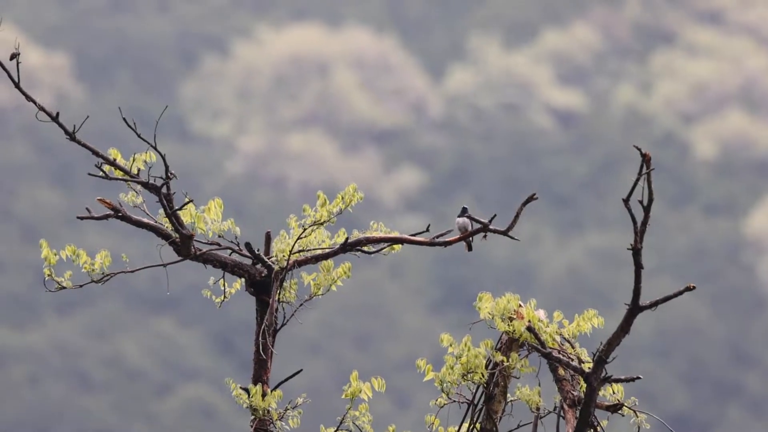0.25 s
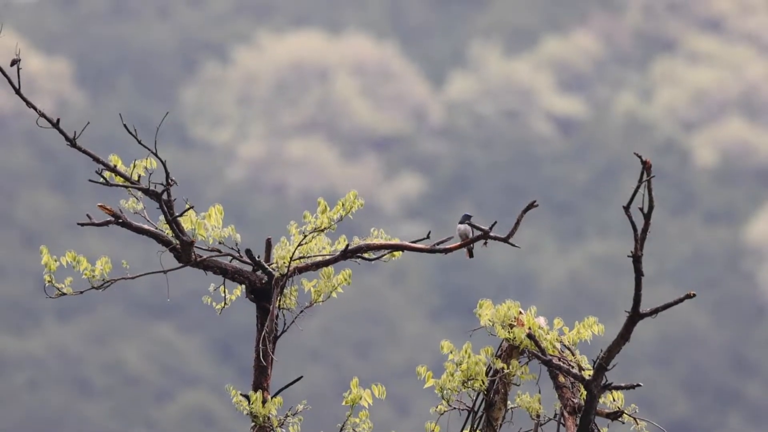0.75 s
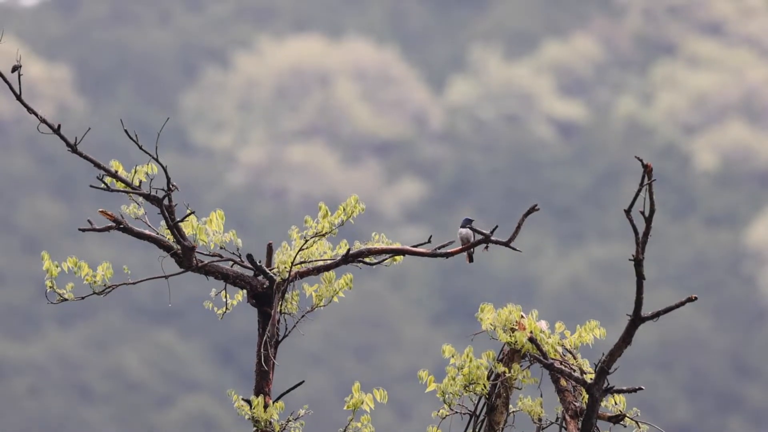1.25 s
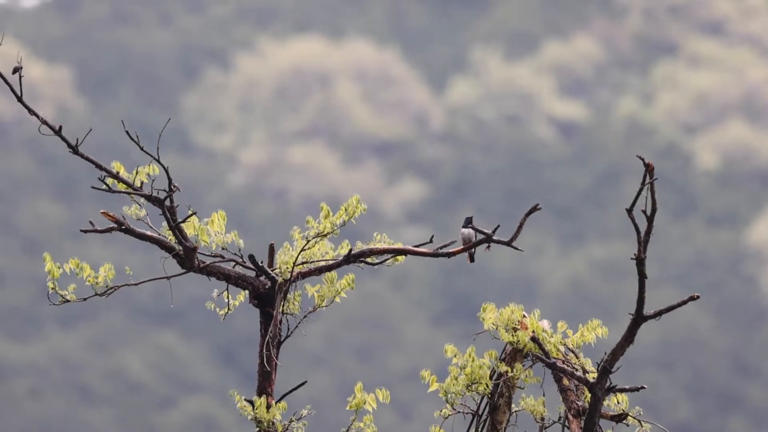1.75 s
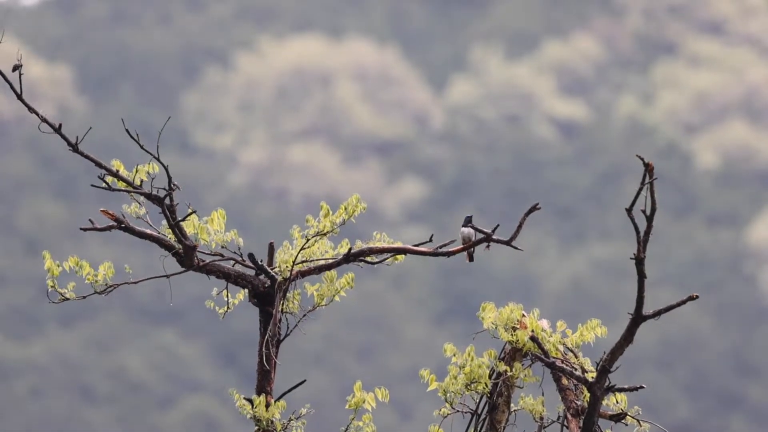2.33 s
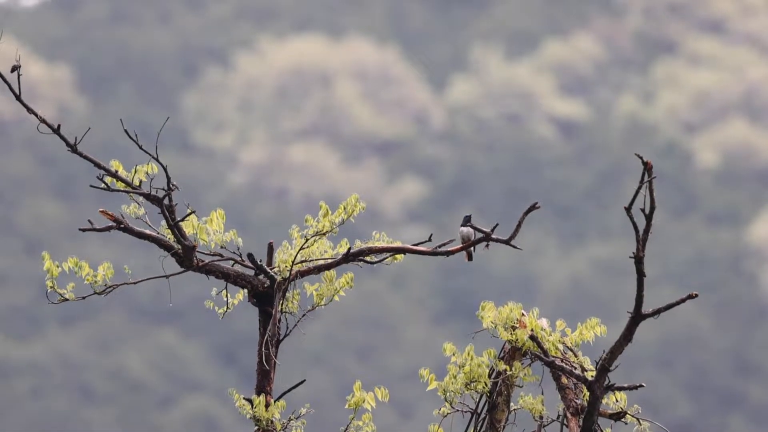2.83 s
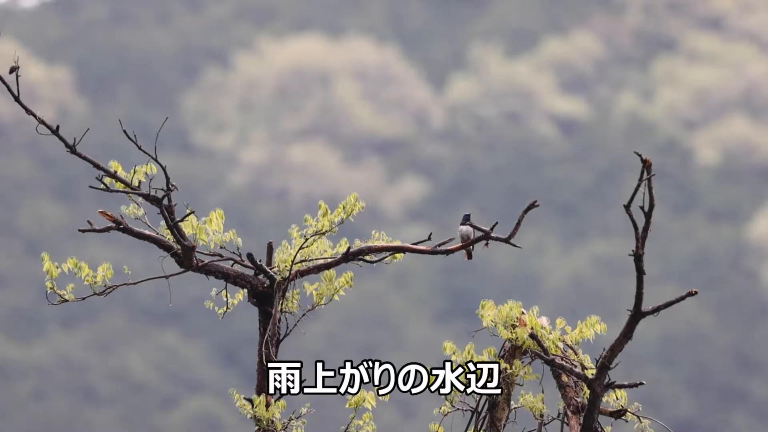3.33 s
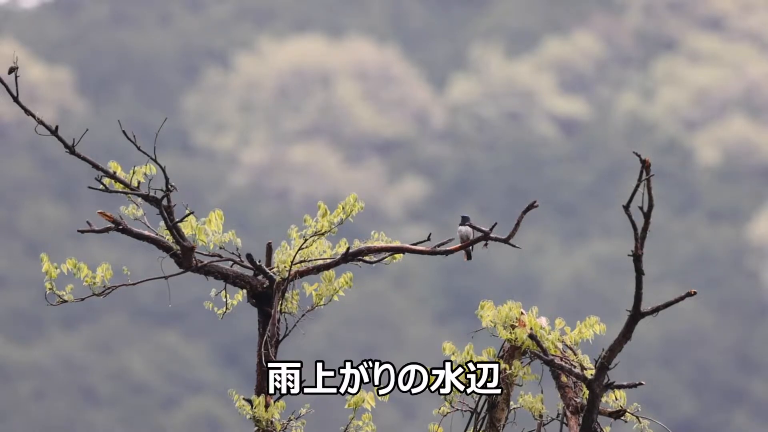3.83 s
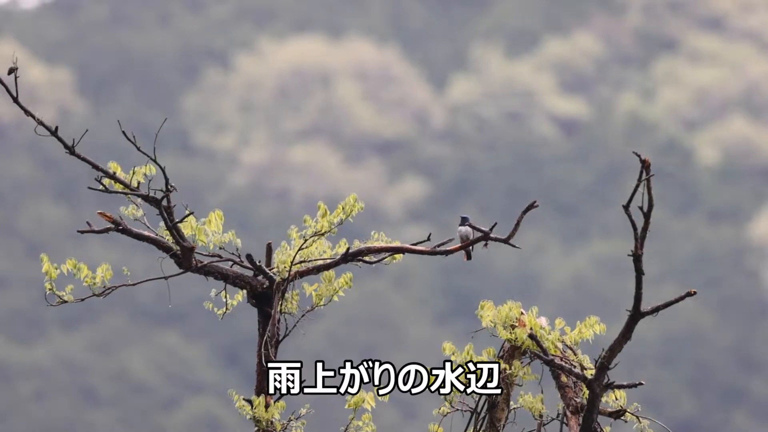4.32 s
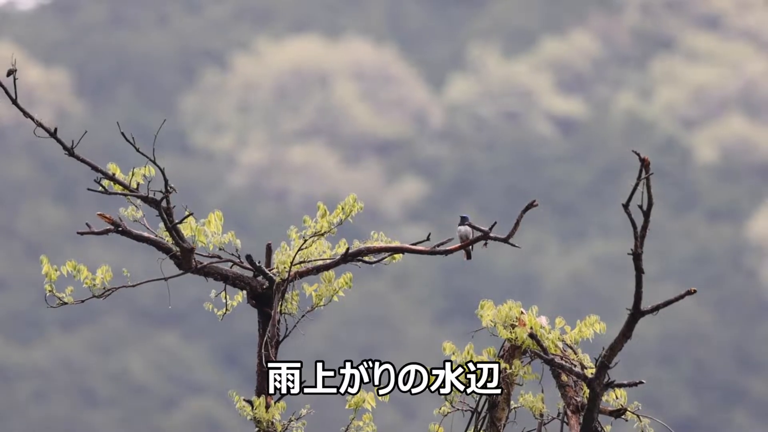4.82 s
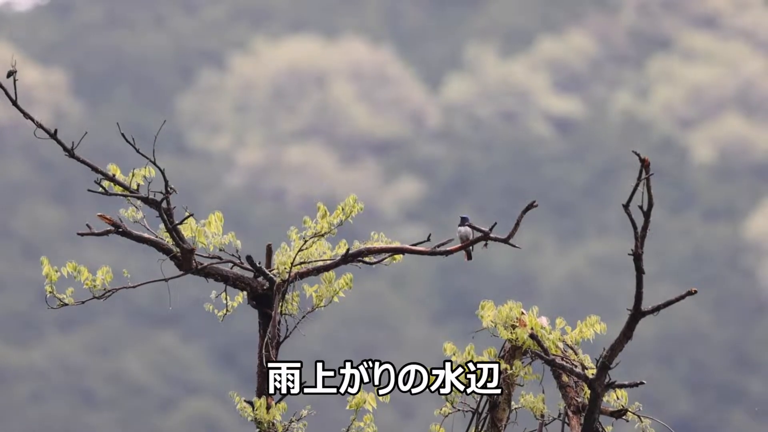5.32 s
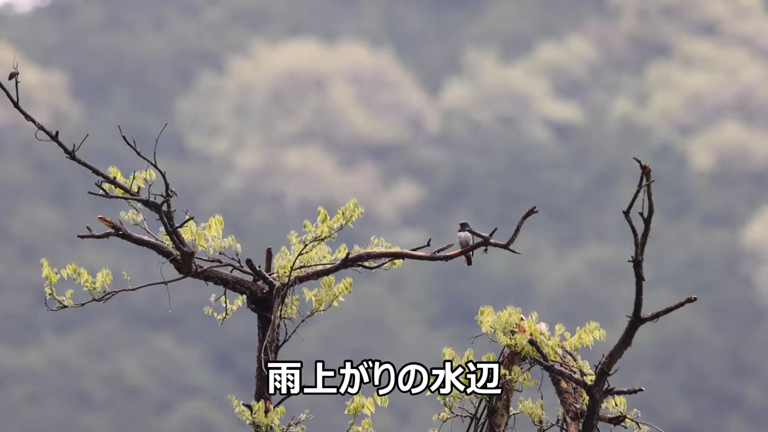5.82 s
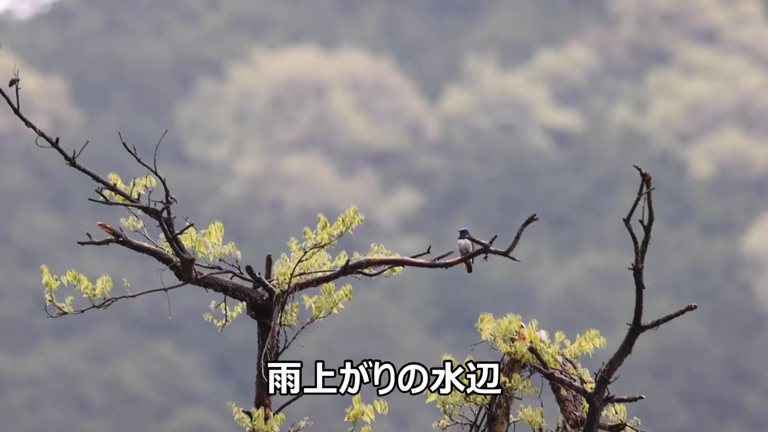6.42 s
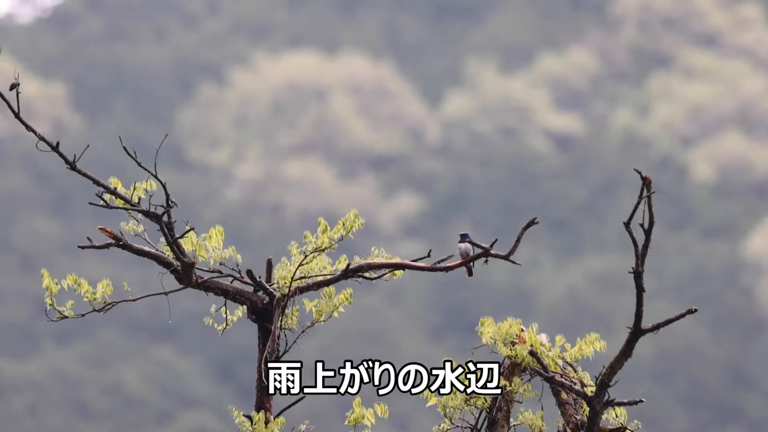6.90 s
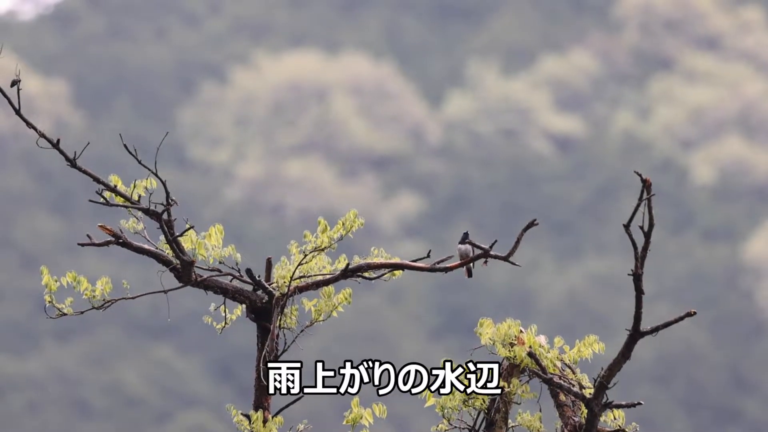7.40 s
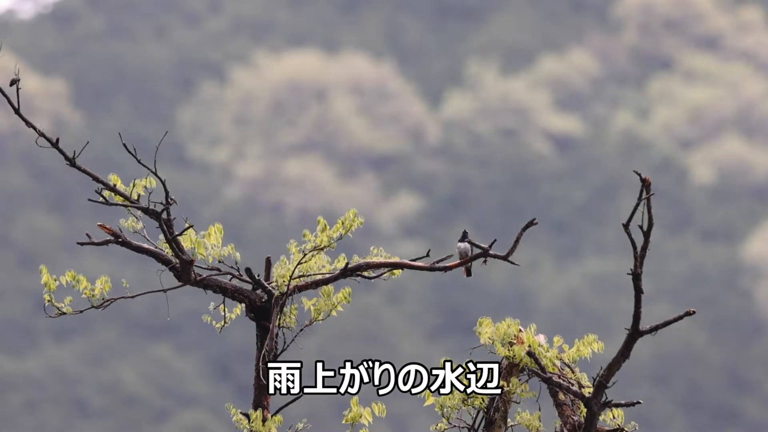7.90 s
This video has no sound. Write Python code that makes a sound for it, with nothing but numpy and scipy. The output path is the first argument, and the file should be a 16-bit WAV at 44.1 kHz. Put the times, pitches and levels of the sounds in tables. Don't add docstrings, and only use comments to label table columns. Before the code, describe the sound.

Outdoor wooded valley, microphone open to a broad water hiss. Small birds call at middle and far distance, softened by long diffuse echoes. One hard click strikes near the start. The nearest bird sings a bright phrase of slur, fast trill, piped note and dry rattle, falls silent for several seconds, then adds a short leaping whistle at the end. Tiny drips and twig taps dot the scene.

```python
import sys
import numpy as np
from scipy import signal
from scipy.fft import rfft, irfft
from scipy.io import wavfile
from scipy.ndimage import uniform_filter1d

SR = 44100
rng = np.random.default_rng(int(sys.argv[2]) if len(sys.argv) > 2 else 0)


def unload_audio(sound):
    columns = np.transpose(np.atleast_2d(sound))
    steps = np.round(np.clip(columns, -1, 1) * 32767)
    wavfile.write(sys.argv[1], SR, steps.astype(np.int16))


def volts(x):
    e = np.asarray(x, float) / 20
    return 10 ** e


N = 359415
T = np.arange(N) / SR

# (frequency [Hz], density [dB per Hz])
STREAM = [(12, -70), (20, -25), (93, -5.5), (146, -0.5), (293, -10), (499, -9.5), (897, -13), (976, -16),
          (1330, -13), (1530, -17), (2990, -20.5), (3950, -23), (4940, -26.5), (16000, -42)]
# (centre [s], half length [s], rise [dB])
RUMBLE = [(0, 0.86, 2.1), (1.2, 0.63, 5.2), (4.2, 0.71, 3.9), (5.2, 0.58, 1.74)]
# (centre [s], half length [s], rise [dB])
WATER_SWELLS = [(2.7, 0.9, 3.13)]
# (time [s], level [dB])
CHORUS = [(0, -54.5), (.5, -59), (1.0, -55.5), (1.5, -51.5), (2.3, -60), (3.0, -50.5), (4.0, -88),
          (5.5, -59), (7.0, -58.5), (8.15, -50.5)]
# (centre [s], half length [s], rise [dB])
FROG_BOUTS = [(.6, 0.53, 12.3), (2.3, .4, 13.8), (8.15, 0.94, 5.5)]
# (centre [Hz], width [Hz], level [dB])
INSECTS = [(8450, 160, -75.5), (13600, 200, -79)]

# (start [s], length [s], from [Hz], to [Hz], peak level
# [dB])
HELD = [(.125, 0.0575, 4930, 5350, -38.5), (.1, 0.071, 3320, 3460, -51.5), (.19, 0.12, 2800, 2825, -40.5),
        (0.47, 0.06, 4730, 4790, -37.5), (0.758, 0.056, 2340, 2340, -45), (0.816, 0.06, 4820, 4730, -39),
        (1.14, 0.042, 3450, 3485, -43.5), (1.187, 0.06, 5010, 4850, -36), (1.475, 0.067, 4750, 4820, -45),
        (4.43, 0.3, 971, 962, -55.5), (4.69, 0.105, 955, 1010, -49), (4.825, 0.065, 1004, 990, -51),
        (4.922, 0.064, 1017, 1010, -42.5), (4.74, 0.23, 3753, 3840, -43.5), (7.962, 0.052, 3780, 3400, -41),
        (8.012, 0.038, 3790, 3820, -42), (2.722, 0.027, 3095, 3092, -32.5), (5.41, .06, 3300, 3450, -47),
        (5.345, 0.12, 3780, 3800, -53), (6.1, .11, 3270, 3230, -54)]
# (start [s], length [s], from [Hz], to [Hz], level [dB])
SLURS = [(.445, 0.041, 3420, 3120, -48), (6.108, .055, 6100, 4350, -55)]
# (start [s], length [s], from [Hz], to [Hz], level [dB])
TIPS = [(4.67, 0.061, 3890, 3140, -48), (5.272, .024, 4060, 3520, -47), (5.285, 0.088, 2570, 3130, -44),
        (5.808, 0.027, 3110, 2490, -38.5), (7.47, .02, 4060, 3730, -53), (7.648, 0.028, 2710, 1760, -38)]
# (start [s], length [s], from [Hz], to [Hz], level [dB])
CHIPS = [(5.896, .01, 5250, 4920, -48), (5.902, .008, 4450, 4800, -47), (5.916, 0.01, 4400, 5700, -49),
         (5.928, .008, 4050, 4500, -46), (5.94, .008, 4100, 4500, -47), (6.067, .015, 4200, 5600, -51),
         (6.078, .015, 4200, 5750, -51), (6.089, .012, 4200, 5300, -52), (7.436, .014, 3700, 4100, -48),
         (7.335, 0.018, 3440, 3520, -49), (6.575, .045, 3440, 3505, -51)]
# (time [s], pitch [Hz], level [dB])
SCOOP = [(4.965, 3025, -42), (4.99, 3330, -43.5), (5.03, 3340, -36), (5.07, 3330, -38.5)]
DIP = [(5.911, 3070, -39), (5.922, 2490, -32), (5.94, 2785, -38), (5.961, 2825, -42)]
LONG_SLUR = [(6.095, 6210, -55), (6.125, 4900, -52), (6.155, 4200, -47.5), (6.2, 3880, -51),
             (6.27, 3430, -52), (6.29, 3100, -53)]
LAST_STEPS = [(7.984, 5580, -56), (8.0, 5450, -50), (8.022, 5080, -44), (8.041, 5170, -45),
              (8.056, 4800, -47), (8.072, 4520, -48), (8.088, 4680, -46), (8.1, 4550, -45),
              (8.125, 3400, -47)]
PEEP = [(8.135, 2750, -48.8), (8.143, 3440, -38), (8.15, 2780, -43)]
# (time from start [s], pitch [Hz], level [dB])
SLIDE = [(0, 6600, -8), (.02, 5300, 4.5), (.04, 4300, 5.5), (.055, 3830, 4), (.07, 3900, 2),
         (.085, 4350, 5.5), (.1, 3750, 3), (.128, 3170, 1)]
FALL = [(0, 4950, -4), (.018, 5200, 5), (.03, 5150, 4), (.042, 4780, 5.5), (.112, 3600, 2.5)]
DROP = [(0, 2805, -8), (.015, 2278, 4.5), (.035, 2200, 2), (.058, 1714, -4.5)]
HOOK = [(0, 3110, -13), (.016, 2161, -3), (.034, 2562, -1), (.05, 2520, -6.5), (.062, 2380, -20)]
STEPS = [(0, 5700, -14), (.016, 5870, -4.5), (.046, 5290, 3), (.062, 5480, -4), (.076, 4750, 7),
         (.09, 4530, -3), (.105, 4880, 3), (.118, 4730, -0.5), (.146, 3390, 2)]
ARCH = [(0, 1847, -3), (.013, 1960, 4.5), (.023, 1755, 1), (.033, 1300, -5.5)]
WARBLE = [(0, 3378, 3), (.018, 3280, 5.5), (.028, 3120, 5.5), (.04, 2780, -3.5)]
# (start [s], pitch factor [1], level [dB])
SLIDES = [(0.185, 1.0, -46.5), (0.535, 0.95, -47), (0.878, 0.94, -45), (1.247, 0.98, -46)]
FALLS = [(0.698, 0.93, -54), (6.646, 0.97, -58), (7.132, 0.96, -57)]
DROPS = [(6.139, 0.99, -34), (6.557, 0.99, -41), (6.997, 0.99, -43), (8.067, 1.025, -41)]
HOOKS = [(6.296, 1.0, -33), (6.72, 1.01, -34.5), (7.176, 0.99, -37), (7.791, 1.035, -40.5)]
STEP_REPEATS = [(6.894, 1.01, -47), (7.177, 1, -45.5), (7.453, 0.98, -44.5), (7.716, 1, -48)]
ARCHES = [(5.047, 1, -34.5)]
# (start [s], pitch factor [1], first level [dB], second level [dB])
WARBLES = [(5.485, 1.01, -46, -50), (5.555, 1.01, -50, -50), (5.632, 1, -45, -49), (5.715, 0.97, -46, -47),
           (5.786, 1.1, -55, -60), (5.9, 1, -49, -58), (6.005, 1, -53, -48), (6.06, 0.97, -48, -59),
           (6.425, 0.95, -53, -48), (6.877, 0.97, -52, -51)]
# (start [s], length [s], from [Hz], to [Hz], level [dB])
FAINT = [(1.245, .045, 4510, 4000, -38), (1.66, 0.09, 3970, 3500, -43), (2.17, .014, 4650, 3900, -38),
         (2.193, .015, 4670, 3770, -42), (2.62, 0.086, 4480, 4730, -50), (4.545, .065, 4860, 4360, -63),
         (4.79, 0.051, 5300, 4800, -58), (5.09, 0.026, 1480, 1440, -39), (5.09, 0.044, 3465, 3410, -38.5),
         (5.2, 0.7, 3390, 3196, -55), (5.352, .13, 4170, 4500, -48.5), (5.595, 0.079, 4430, 4420, -52),
         (5.71, 0.15, 4450, 3950, -53), (5.97, 0.088, 4350, 4310, -55.5), (6.265, 0.018, 5400, 6000, -61),
         (7.162, .016, 3350, 5400, -50), (7.437, 0.028, 4120, 5720, -54), (7.58, 0.066, 6770, 6660, -61)]
# (start [s], length [s], low [Hz], high [Hz], level [dB])
TWITTERS = [
    (5.065, .09, 3500, 4250, -45),
    (5.59, .12, 4200, 5200, -49),
    (4.28, .15, 4300, 4420, -55),
    (2.1, .4, 1750, 2000, -56),
    (7.04, .06, 3300, 3700, -51),
]

# (time [s], step [dB], low cut [Hz])
POPS = [
    (.4902, -19, 900),
    (.52624, 20.4, 98),
    (1.9395, -28, 900),
]
# (time [s], peak level [dB], ringing frequency [Hz])
DRIPS = [(0.7854, -20.5, 2250), (1.411, -47, 4310), (1.4855, -35, 4080), (3.8576, -32, 1700),
         (4.314, -30.5, 2140), (4.4662, -42, 1530), (6.4346, -27, 2550), (6.5514, -45, 2200)]
# (time [s], peak level [dB], ringing frequency [Hz])
TAPS = [
    (1.9385, -25, 1340),
    (1.9395, -19.5, 2100),
    (1.5, -30, 1700),
    (1.688, -36, 10000),
]

# (time [s], pitch [Hz], level [dB])
RISE = [(1.46, 3900, -45.5), (1.5, 4094, -28), (1.55, 4260, -25.5), (1.58, 4520, -23), (1.605, 4840, -20),
        (1.625, 5136, -20.5), (1.64, 5250, -22.5), (1.657, 5175, -23)]
PLUNGE = [(2.292, 4430, -27), (2.297, 5030, -28.5), (2.304, 5520, -28.5), (2.312, 4850, -29.5),
          (2.322, 3580, -31), (2.335, 3050, -30.5), (2.35, 2600, -35.5), (2.368, 2000, -47)]
PIPE = [(2.565, 2760, -53), (2.582, 2804, -42), (2.62, 2936, -32), (2.644, 3046, -28), (2.66, 3082, -30.5),
        (2.675, 3097, -24.5), (2.698, 3092, -20), (2.715, 3100, -30)]
FLICK_UP = [(7.565, 3320, -42), (7.585, 3420, -38.5), (7.606, 3870, -27.5), (7.63, 4087, -26.5),
            (7.661, 4080, -21), (7.69, 4222, -27.5), (7.72, 4275, -29), (7.734, 5010, -20.5)]
# (2nd [dB], 3rd [dB], 4th [dB])
OVERTONES = [
    (-41.5, -44, -58),
    (-26.5, -34, -46.5),
    (-41, -58, -43),
    (-42, -43, -45),
    (-37, -34, -50),
    (-47, -56, -45),
]
# (end [s], level [dB], top pitch [Hz])
TRILL = [(1.945, -32, 3270), (1.965, -31, 3590), (1.985, -28.5, 3630), (2.01, -30.5, 3640),
         (2.035, -29.5, 3640), (2.058, -28, 3770), (2.084, -28, 3777), (2.109, -29.5, 3646),
         (2.132, -34, 3590), (2.153, -31, 3650), (2.181, -30.5, 3690), (2.2, -32, 3690), (2.23, -36, 3690),
         (2.258, -42, 3660)]
# (time [s], level [dB], middle pitch [Hz])
RATTLE = [(2.8055, -31.5, 5480), (2.835, -39, 4450), (2.872, -34, 5450), (2.8967, -32, 5160),
          (2.919, -35, 5600), (2.937, -31.5, 5410), (2.958, -33, 4980), (2.976, -29.5, 4820),
          (2.994, -37, 5600), (3.012, -32.5, 4610), (3.033, -29.5, 4930), (3.051, -34, 5170),
          (3.07, -36.5, 5070)]
# (time [s], level [dB], middle pitch [Hz])
GRACE = [(2.292, -30, 5740), (2.821, -38, 5980), (2.848, -33.5, 5700), (2.853, -34, 4820),
         (2.865, -47, 5590), (2.902, -39, 5600), (3.016, -41, 6100)]
# (start [s], length [s], level [dB], fullest lift [Hz])
ZIGZAG_BREATHS = [
    (7.828, 0.073, -27.5, 520),
    (7.908, 0.055, -25.5, 250),
]
# (time [s], top pitch [Hz])
LEAPS = [
    (7.851, 5450),
    (7.885, 4600),
    (7.923, 4500),
    (7.957, 4540),
]


def rms_one(x):
    return x / np.sqrt(np.mean(x ** 2) + 1e-20)


def drift(rate_hz):
    hop = 40
    pole = np.exp(-2 * np.pi * hop * rate_hz / SR)
    noise = rng.standard_normal(N // hop + 2002)
    slow = signal.lfilter([1], [1, -2 * pole, pole * pole], noise)[2000:]
    return np.interp(np.arange(N) / hop, np.arange(len(slow)), rms_one(slow))


def swells(rest_db, rows):
    return rest_db + sum(db * np.exp(-((T - s) / half) ** 2) for s, half, db in rows)


def band_noise(low_hz, high_hz):
    band = signal.butter(2, [low_hz, high_hz], "band", fs=SR, output="sos")
    return rms_one(signal.sosfilt(band, rng.standard_normal(N)))


def add(out, start_s, sound):
    i = round(start_s * SR)
    out[i:i + len(sound)] += sound[:N - i]


def echo(x, delay_s, level_db):
    return volts(level_db) * np.roll(x, round(delay_s * SR))


def whistle(hz, level_db, overtones_db=(), edge_s=.003):
    phase = 2 * np.pi * np.cumsum(hz) / SR
    tone = np.sin(phase)
    for harmonic, db in enumerate(overtones_db, 2):
        audible = harmonic * hz < SR / 2
        tone = tone + volts(db) * np.sin(harmonic * phase) * audible
    k = np.arange(len(hz))
    edge = np.clip(np.minimum(k, k[::-1]) / (edge_s * SR), 0, 1)
    return np.sqrt(2) * volts(level_db) * edge * tone


def notes(tables, overtones=None):
    out = np.zeros(N)
    for table, overtones_db in zip(tables, overtones or [()] * len(tables)):
        s, hz, level_db = np.transpose(table)
        t = np.arange(s[0], s[-1], 1 / SR)
        path = uniform_filter1d(np.interp(t, s, hz), size=80, mode="nearest")
        add(out, s[0], whistle(path, np.interp(t, s, level_db), overtones_db))
    return out


def repeats(motif, times):
    return notes([np.array(motif) * [1, factor, 1] + [s, 0, db] for s, factor, db in times])


def glides(rows, bend, peak_share, edge_db):
    out = np.zeros(N)
    for s, length, from_hz, to_hz, db in rows:
        place = np.linspace(0, 1, round(length * SR))
        before = 1 - place / peak_share
        after = (place - peak_share) / (1 - peak_share)
        away = np.where(place < peak_share, before, after)
        hz = from_hz + (to_hz - from_hz) * place ** bend
        add(out, s, whistle(hz, db + edge_db * away))
    return out


def stream():
    hz = np.maximum(np.fft.rfftfreq(N, 1 / SR), 1)
    points = np.array(STREAM)
    density_db = np.interp(np.log(hz), np.log(points[:, 0]), points[:, 1])
    colour = volts(density_db) * rfft(rng.standard_normal(N))
    low = 1 / (1 + (hz / 260) ** 4)
    rumble = irfft(colour * low, N) * volts(swells(-1, RUMBLE) + 0.94 * drift(6.3))
    hiss = irfft(colour * (1 - low), N) * volts(0.58 * drift(1.0) + .5 * drift(25))
    return volts(-41.5) * rms_one(rumble + hiss)


def chorus():
    birds = volts(np.interp(T, *np.transpose(CHORUS)) + 4.8 * drift(23)) * band_noise(2380, 4920)
    frogs = volts(swells(-62.5, FROG_BOUTS) + 1.5 * drift(8.8)) * band_noise(1714, 2074)
    out = birds + frogs
    for hz, width, db in INSECTS:
        out = out + volts(db + 1.5 * drift(2.5)) * band_noise(hz - width / 2, hz + width / 2)
    return out


def singles():
    held = glides(HELD, bend=0.99, peak_share=0.64, edge_db=-9)
    slurs = glides(SLURS, bend=.45, peak_share=0.43, edge_db=-6.5)
    tips = glides(TIPS, bend=1.275, peak_share=0.58, edge_db=-6.5)
    chips = glides(CHIPS, bend=1, peak_share=.5, edge_db=-7.0)
    return held + slurs + tips + chips + notes([PEEP, SCOOP, DIP, LONG_SLUR, LAST_STEPS])


def neighbours():
    slides = repeats(SLIDE, SLIDES)
    slides = slides + echo(slides, .025, -1.5) + echo(slides, .058, -13)
    steps = repeats(STEPS, STEP_REPEATS)
    steps = steps + echo(steps, 0.02, -10.5)
    clear = repeats(DROP, DROPS) + repeats(HOOK, HOOKS) + steps + repeats(FALL, FALLS)
    air = drift(90)
    clear = clear * volts(2.2 * air)
    return clear + singles() * volts(3.5 * air - 1) + slides * volts(3 * drift(60) - 3)


def pops():
    out = np.zeros(N)
    for s, db, cut_hz in POPS:
        step = volts(db) * np.clip(np.arange(3000) / 0.34, 0, 1)
        stage = signal.butter(1, cut_hz, "high", fs=SR, output="sos")
        add(out, s, signal.sosfilt(np.repeat(stage, 3, axis=0), step))
    return out


def damped_rings(rows, t60_s, gain_db):
    out, t = np.zeros(N), np.arange(400) / SR
    for s, db, hz in rows:
        add(out, s, volts(db + gain_db - 60 * t / t60_s) * np.sin(2 * np.pi * hz * t))
    return out


def drips():
    return damped_rings(DRIPS, t60_s=0.0023, gain_db=2)


def far_birds():
    pair_gap_s = 0.03
    pairs = []
    for s, factor, first_db, second_db in WARBLES:
        pairs += [(s, factor, first_db), (s + pair_gap_s, factor, second_db)]
    faint = glides(FAINT, bend=1, peak_share=.4, edge_db=-4)
    return (repeats(WARBLE, pairs) + faint + twitters()) * volts(2.5 * drift(90))


def slurs_near():
    return notes([RISE, PLUNGE, FLICK_UP], OVERTONES[:2] + OVERTONES[3:])


def taps():
    return damped_rings(TAPS, t60_s=0.0048, gain_db=0)


def trill():
    out, start, gap_s = np.zeros(N), 1.929, 0.0052
    for end, db, top_hz in TRILL:
        place = np.linspace(-1, 1, round((end - start - gap_s) * SR))
        arch = 1 - 0.327 * np.abs(place) ** 2.17
        hz = top_hz * volts(0.029 * rng.standard_normal()) * arch
        add(out, start + gap_s, whistle(hz, db - 10 * place ** 2, (-50, -52, -38)))
        start = end
    out = out + echo(out, 470 / SR, -6.5)
    return out * volts(2.8 * drift(200))


def twitters():
    out = np.zeros(N)
    beats = np.cumsum(95 * volts(1.8 * drift(39.96))) / SR
    for s, length, low_hz, high_hz, db in TWITTERS:
        beat = beats[round(s * SR):round((s + length) * SR)] % 1
        hz = low_hz + (high_hz - low_hz) * beat
        add(out, s, whistle(hz, db, edge_s=0.005) * np.sin(np.pi * beat))
    return out


def rattle():
    out, place = np.zeros(N), np.linspace(0, 1, 165)
    first_s = RATTLE[0][0]
    # 1900 Hz, growing 5600 Hz per second
    ticks = [(s, db, hz, 1900 + 5600 * (s - first_s)) for s, db, hz in RATTLE]
    ticks += [(s, db, hz, 1200) for s, db, hz in GRACE]
    for s, db, mid_hz, sweep_hz in ticks:
        hz = mid_hz + sweep_hz * (.5 - place)
        throat_db = -0.8 * ((hz - 5500) / 1e3) ** 2
        overtone_db = -18 - 2.5 * ((2 * hz - 10900) / 1e3) ** 2
        level_db = db - 5 * (place - .35) ** 2 + throat_db
        add(out, s, whistle(hz, level_db, (overtone_db,), edge_s=0.0014))
    return out * volts(2.2 * drift(300))


def zigzag():
    out, base_hz, leap_half_s = np.zeros(N), 3800, .0105
    for (start, length, db, best_lift_hz), overtones_db in zip(ZIGZAG_BREATHS, OVERTONES[4:]):
        t = np.arange(0, length, 1 / SR)
        lift = np.zeros(len(t))
        for s, top_hz in LEAPS:
            lift += (top_hz - base_hz) * np.clip(1 - np.abs(t + start - s) / leap_half_s, 0, 1)
        lift = uniform_filter1d(lift, size=80, mode="nearest")
        detuning_db = -8 * np.abs(lift - best_lift_hz) / 1e3
        breath_db = 2.5 * t / length - 18 * np.clip(1 - t / 0.013, 0, 1)
        faded_db = [over_db - 9 * (k + .6) * lift / 1e3 for k, over_db in enumerate(overtones_db)]
        add(out, start, whistle(base_hz + lift, db + detuning_db + breath_db, faded_db))
    return out


def valley(x, level_db, near_t60, far_t60, far_db):
    t = np.arange(60000) / SR
    decay = volts(-60.0 * t / near_t60) + volts(far_db - 60 * t / far_t60)
    onset = np.clip(t / .012, 0, 1)
    tail = rng.standard_normal(len(t)) * decay * onset
    return x + volts(level_db) * signal.fftconvolve(x, tail / np.sqrt(np.sum(tail ** 2)))[:N]


def scene():
    pipe = notes([PIPE], [OVERTONES[2]])
    near = slurs_near() + volts(-6.5) * pipe + zigzag()
    near = near * volts(1.55 * drift(60)) + trill() + rattle() + volts(0.5) * repeats(ARCH, ARCHES)
    near = near + echo(near, .016, -15)
    near = valley(volts(3.0) * near, level_db=-5.0, near_t60=0.35, far_t60=2.3, far_db=-17.0)
    middle = valley(volts(1.5) * neighbours(), level_db=-2.5, near_t60=0.1, far_t60=1.45, far_db=-11.5)
    far = valley(volts(-4.5) * far_birds(), level_db=-.5, near_t60=.35, far_t60=1.0, far_db=-8)
    water = volts(swells(-.5, WATER_SWELLS)) * stream()
    birds = near + volts(-2) * pipe + middle + far
    return (birds + chorus() + water + drips() + taps() + pops())[None]


def roll_off(x):
    return signal.sosfilt(signal.butter(12, 16640, fs=SR, output="sos"), x)


def record(dry):
    duck_s, limit_s, limit_length_s = 0.5085, .5095, .032
    since = T - duck_s
    duck_db = np.minimum(-7.5 + 2 * since, 0) * np.clip(since / 0.0015, 0, 1)
    limiting = 1.0 * (np.abs(T - limit_s - limit_length_s / 2) < limit_length_s / 2)
    gain_db = duck_db - 4 * uniform_filter1d(limiting, size=90)
    clipped = np.clip(dry * volts(gain_db), -.98, .98)
    top_cut = signal.ellip(8, .1, 40, 15750, fs=SR, output="sos")
    return roll_off(signal.sosfiltfilt(top_cut, clipped))


dry = scene()
out = record(dry)
unload_audio(out)
```